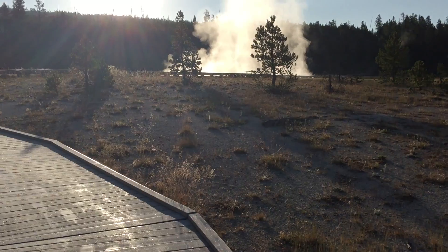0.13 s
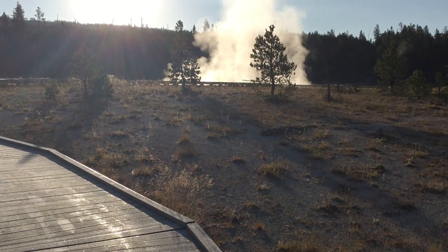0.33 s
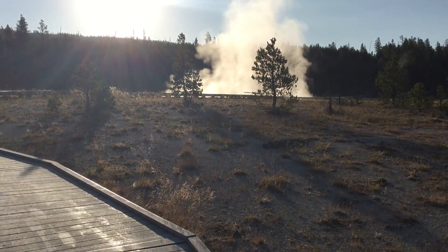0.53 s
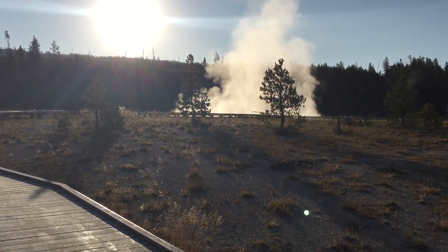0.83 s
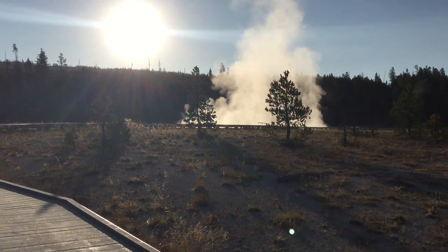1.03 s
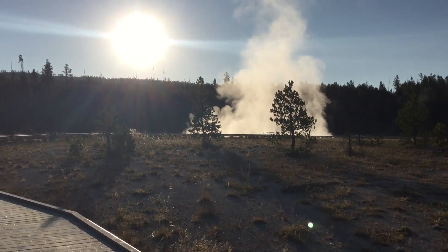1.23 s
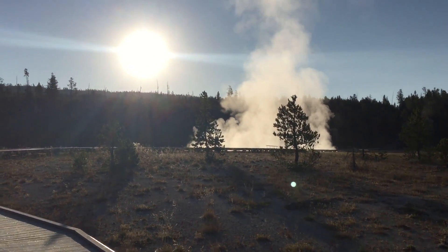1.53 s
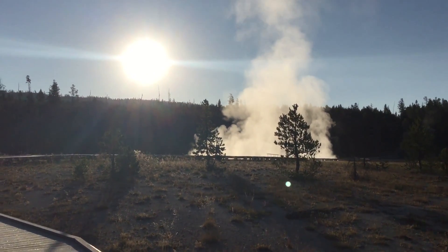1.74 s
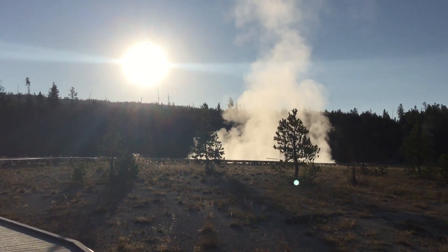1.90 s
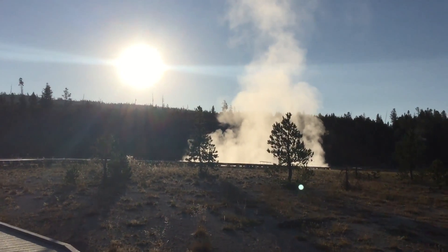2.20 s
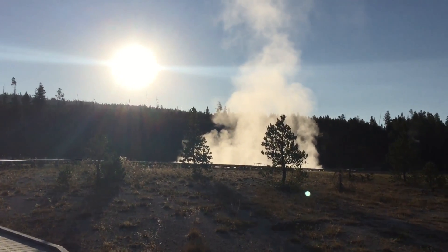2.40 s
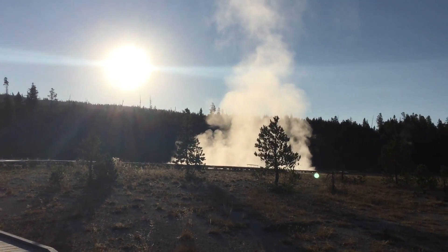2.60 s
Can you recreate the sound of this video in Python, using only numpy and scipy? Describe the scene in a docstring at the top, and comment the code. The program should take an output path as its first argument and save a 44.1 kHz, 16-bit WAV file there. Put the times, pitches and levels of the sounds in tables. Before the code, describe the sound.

A coyote pack far across a meadow gives quick overlapping yips and slightly hoarse barks, with one brief falling howl early on; faint echoes from trees, soft wind rumble, hiss and a dull handling knock.

```python
"""A coyote pack far across a meadow: overlapping yips and barks, one falling howl among the early ones.
Yips are arched harmonic tones, the howl has three harmonics; barks add lines between and coloured rasp.
Ground and air filter the pack; the tree line adds faint diffuse tails of decaying noise.
Filtered noise gives lumpy wind rumble and hiss; dull knocks on the handheld body are decaying sines."""
import sys
import numpy as np
from scipy import signal
from scipy.fft import rfft, irfft
from scipy.io import wavfile
from scipy.ndimage import uniform_filter1d

SR = 44100
rng = np.random.default_rng(int(sys.argv[2]) if len(sys.argv) > 2 else 0)


def bounce(signal):
    """Save signal as a 16-bit WAV file at the path given by the first command-line argument."""
    frames = np.transpose(np.atleast_2d(signal))
    limited = np.clip(frames, -1, 1)
    pcm = np.round(limited * 32767).astype(np.int16)
    wavfile.write(sys.argv[1], SR, pcm)


N = 121275


def amp(db):
    """Amplitude factor of a level in dB."""
    return 10 ** (np.asarray(db) / 20)


def evened(x):
    """Scale to unit RMS."""
    return x / np.sqrt(np.mean(x ** 2) + 1e-20)


def read(points, hz):
    """Interpolate a (frequency, value) curve on a log frequency axis."""
    f, value = np.transpose(points)
    return np.interp(np.log(hz + 1), np.log(f + 1), value)


def add(mix, start_s, sound):
    """Mix a sound in at its start time, cut at the end of the mix."""
    part = mix[round(start_s * SR):][:len(sound)]
    part += sound[:len(part)]


def coloured(x, points):
    """Zero-phase filter along a (frequency, dB) curve."""
    gain = amp(read(points, np.fft.rfftfreq(len(x), 1 / SR)))
    return irfft(rfft(x) * gain, len(x))


def drifting(noise, size):
    """Smooth each noise row twice over size samples: slow random drift of unit RMS."""
    smooth = uniform_filter1d(uniform_filter1d(noise, size=size), size=size)
    return np.array([evened(row) for row in smooth])


def wind_and_hiss():
    """Noise shaped frame by frame: hiss with faint patches, and wind rumble that comes in lumps."""
    # noise spectrum: (frequency [Hz], relative level [dB])
    spectrum = [(22, -46), (45, 2.5), (80, 0), (500, -13), (2000, -14), (4600, -25.5), (9800, -29.5),
                (15700, -34)]
    level_db, patchy_db, gust_db, gust_corner_hz = -68, -0.5, 0.5, 300
    frames, hz = N // 512 + 5, np.fft.rfftfreq(2048, 1 / SR)
    real, imag, patches = rng.standard_normal((frames, 1025, 3)).T
    lumps = evened(uniform_filter1d(patches[0], size=4))
    patches = uniform_filter1d(patches, size=24, axis=0)  # across frequency
    patches = evened(uniform_filter1d(patches, size=7, axis=1))  # across time
    low = 1 / (1 + (hz / gust_corner_hz) ** 2)
    gain_db = read(spectrum, hz)[:, None] + patchy_db * patches + gust_db * low[:, None] * lumps
    z = (real + 1j * imag) * amp(gain_db)
    noise = signal.istft(z, nperseg=2048, noverlap=1536)[1][:N]
    return amp(level_db) * evened(noise)


def body_knock(start_s, level_db, settled_hz):
    """A dull knock on the handheld body: a decaying sine with a louder onset and a fast pitch drop."""
    t60_s, snap, snap_s = 0.16, 2.91, 0.00366
    onset_db, onset_s, attack_s = 12.34, 0.0017, 0.00093
    t = np.arange(0, .1, 1 / SR)
    turns = np.cumsum(settled_hz * (1 + snap * np.exp(-t / snap_s))) / SR
    envelope_db = level_db - 60 * t / t60_s + onset_db * np.exp(-t / onset_s)
    attack = np.minimum(t / attack_s, 1)
    return start_s, amp(envelope_db) * attack * np.sin(2 * np.pi * turns)


def treeline(x):
    """Three diffuse decaying noise tails from stands of trees; moving air makes each come and go."""
    tail_db, t60_s, rise_s = -15, 0.661, 0.0053
    t = np.arange(SR // 2) / SR
    tails = rng.standard_normal((3, len(t))) * amp(-60 * t / t60_s) * np.clip(t / rise_s, 0, 1)
    tails /= np.linalg.norm(tails)
    stir = drifting(rng.standard_normal((len(tails), N)), size=600)
    echoes = signal.fftconvolve(x[None], tails, axes=1)[:, :N]
    return amp(tail_db) * (stir * echoes).sum(0)


def across_meadow(x):
    """Ground and air between pack and microphone colour the sound and dull its treble."""
    # path response: (frequency [Hz], gain [dB])
    path = [(500, -18.5), (700, -0.5), (950, 3), (1390, -5), (1480, -7), (1560, -2), (1800, -2.5),
            (2300, -0.5), (2750, -1), (3800, -8.5), (4600, -26.5), (5200, -38.5)]
    return coloured(x, path)


def howl():
    """A clean falling voice of three harmonics, each with its own level."""
    # voice ahead of the path: (time [s], pitch [Hz], fundamental [dB RMS],
    # 2nd harmonic [dB RMS], 3rd harmonic [dB RMS])
    contour = [(.312, 1232, -84, -92, -87), (0.362, 1225, -49, -52, -75.5), (0.412, 1180, -54, -55, -91),
               (0.462, 1043, -59.5, -58, -73), (.52, 939.8, -51.5, -80.5, -66.5),
               (0.569, 842.9, -47.5, -64, -61), (0.609, 896.2, -60, -55.5, -85.5),
               (0.701, 873, -56.5, -57.5, -82.5), (0.723, 890, -90.5, -63.5, -94),
               (0.776, 883, -65, -62, -86)]
    fade_s = 0.0062
    s, hz, *levels_db = np.transpose(contour)
    t = np.arange(s[0], s[-1], 1 / SR)
    pitch_hz = uniform_filter1d(np.interp(t, s, hz), size=600, mode="nearest")
    turns = np.cumsum(pitch_hz) / SR
    fade = np.minimum(np.minimum(t - s[0], s[-1] - t) / fade_s, 1)
    voice = np.zeros(len(t))
    for harmonic, db in enumerate(levels_db, 1):
        level = np.sqrt(2) * amp(np.interp(t, s, db))
        voice += level * np.sin(2 * np.pi * harmonic * turns)
    return s[0], fade * voice


def call(start_s, length_s, first_hz, top_hz, last_hz, top_at, loud_at, level_db, second_db, third_db,
         hoarse_db=-120, beats=2, mouth=1):
    """An arched fluttering tone; in a bark uneven fold beats add lines between harmonics, and rasp."""
    # throat colour of hoarse parts: (frequency at mouth factor 1 [Hz], gain [dB])
    throat = [(550, -14), (800, -19), (1500, 7.5), (2050, -9.5), (3500, -8.5)]
    bulge, hoarse_bulge = .6, 1.84  # envelope exponents
    wobble, fold_waver_rad = 0.00694, 0.12  # RMS pitch jitter share; waver before division by beats
    fourth_db = -13  # re 2nd harmonic
    flutter_db, uneven_db, rasp_db, blur_db = 2, 4.5, -4, -14

    noise = rng.standard_normal((24, 7000))
    u = np.arange(0, length_s, 1 / SR) / length_s
    slow = drifting(noise, size=400)[:, :len(u)]
    fast = drifting(noise[:2], size=60)[:, :len(u)]
    top_at, loud_at, beats = np.clip(top_at, .05, .95), np.clip(loud_at, .12, .88), round(beats)

    rise_hz = (top_hz - first_hz) * (1 - u / top_at) ** 2
    fall_hz = (top_hz - last_hz) * ((u - top_at) / (1 - top_at)) ** 2
    hz = top_hz - np.where(u < top_at, rise_hz, fall_hz)
    turns = np.cumsum(hz * (1 + wobble * fast[0])) / SR
    swell = np.sin(np.pi * np.interp(u, [0, loud_at, 1], [0, .5, 1])) ** bulge

    clean = np.zeros(len(u))
    for k, gain in enumerate(amp([0, second_db, third_db, second_db + fourth_db])):
        flutter = amp(flutter_db * np.sqrt(k + 1) * slow[k])
        clean += gain * swell ** k * flutter * np.sin(2 * np.pi * (k + 1) * turns)
    blur = 1 + amp(blur_db) * fast[1]

    lines = np.zeros(len(u))
    fold_phase = (2 * np.pi * turns + fold_waver_rad * fast[1]) / beats
    for k in range(1, 4 * beats):
        if k % beats:  # skip the harmonics
            lines += amp(uneven_db * slow[k + 4]) * np.sin(k * fold_phase + k * k)
    rasp = amp(rasp_db) * 2 * noise[3, :len(u)]
    hoarse = np.pad(swell ** hoarse_bulge * (lines + rasp), (0, 400))
    hoarse = coloured(hoarse, np.multiply(throat, [mouth, 1]))[:len(u)]
    return start_s, np.sqrt(2) * amp(level_db) * (swell * clean * blur + amp(hoarse_db) * hoarse)


def scene():
    """Pack heard across the meadow with tree line tails, over wind, hiss and knocks."""
    # knocks: (start [s], level before onset boost and decay [dB], settled pitch [Hz])
    knocks = [(0.965, -45.5, 81.4), (1.121, -62, 84.3)]
    # clear calls and a few faint echoes of them, ahead of the path: (start [s], length [s],
    # first pitch [Hz], top pitch [Hz], last pitch [Hz], top at [share], loudest at [share],
    # level [dB], 2nd harmonic [dB re level], 3rd harmonic [dB re level])
    yips = [(0.096, 0.0492, 1642, 1642, 1230, 0.1824, 0.574, -46, -13, -5.5),
            (0.205, 0.0986, 1316, 1573, 1327, 0.613, 0.168, -44, -10, -16.5),
            (0.253, 0.0782, 856.5, 1147, 1170, 1, 0.234, -49, -7, -29),
            (0.337, 0.0856, 717.5, 851.6, 862.6, 0.519, 1, -45, -22.5, -23),
            (0.555, 0.1375, 617, 673.5, 579, 0.55, 0.315, -62.5, 7, -11),
            (.6, 0.0398, 797.3, 828.5, 790, 0.89, 0.236, -49.5, -25.5, -38.5),
            (0.729, 0.0493, 808.5, 1123, 1160, 0.991, 0.523, -45, -13.5, -31),
            (0.756, 0.1021, 1252, 1473, 788, .55, 0.234, -42, -14.5, -20),
            (0.721, 0.0933, 710.1, 807.4, 790, 0.495, 0.583, -48.5, -41, -18),
            (0.871, 0.0384, 731, 822.7, 937, 0.713, 1, -45, -18, -21),
            (0.901, 0.0805, 1352, 1529, 1285, 0.5316, 0.316, -46.5, -26.5, -26.5),
            (1.105, 0.0373, 961.3, 1028, 987, 0.47, 1, -60.5, -10.5, -17.5),
            (1.147, 0.026, 605.2, 729.9, 690, 1, 0.56, -50, -16, -33),
            (1.171, 0.0978, 975, 1274, 1075, 0.625, 0.28, -44.5, -27.5, -40),
            (1.361, 0.0694, 1044, 1261, 1007, 0.393, 0.62, -60, -1, -27.5),
            (1.477, 0.0773, 756.2, 918.5, 860, 0.3576, 0.34, -50, -7, -29),
            (1.554, 0.0231, 1018, 1228, 1274, 0.766, 0.224, -60.5, 4, -15),
            (1.561, 0.0399, 1260, 1394, 1194, 0.527, 0.48, -45, -19.5, -31.5),
            (1.925, 0.12, 609.8, 930.8, 809.4, 0.59, 0.631, -44, -10, -10.5),
            (2.071, 0.15, 892.7, 954, 915, 0.58, 0.5, -66, -10, -31.5),
            (2.129, 0.0405, 1134, 1272, 1180, 0.524, 0.17, -57.5, -25.5, -32),
            (2.177, 0.03537, 594.3, 832.5, 760, 0.89, 0.79, -45.5, -40, -24.5),
            (2.38, 0.02833, 729.5, 782.4, 810, 1, 1, -48.5, 1, 1.5),
            (2.399, 0.09025, 804.4, 932.8, 754, 0.646, 0.087, -42, -12, -9.5),
            (2.489, 0.0917, 646.1, 701.7, 596, 0.432, 1, -55, -38, -34),
            (2.503, 0.15, 895.4, 946, 828, 0.301, 0.31, -61.5, -17.5, -23.5),
            (2.659, 0.0359, 1624, 1527, 1578, 0.343, 1, -58, -24, -29),
            (2.697, 0.079, 646, 820.5, 789, 0.602, 0.388, -53.5, -29.5, -31.5)]
    # hoarse calls: (the ten columns of yips, hoarse part [dB re level],
    # fold beats per repeating pattern [count], mouth opening [factor on throat resonances])
    barks = [(.1, 0.1554, 1015, 1001, 881, 0.232, 0.135, -64.5, -15.5, -20, -7.5, 4, 0.962),
             (.185, 0.0925, 603.2, 823.8, 698, 0.809, 0.837, -44, -35, -26.5, -11.5, 2, 1.012),
             (0.904, 0.0917, 993.8, 1000, 843.6, 0.447, 0.54, -52, -10.5, -14.5, -5.5, 2, 1.078),
             (1.172, 0.0792, 809.4, 937.7, 909.7, 0.3675, 0.432, -41.5, -22, -24, -18.5, 4, 1.026),
             (1.3, 0.0878, 742.2, 954.6, 880.2, 0.577, 0.712, -42, -26, -48, -22, 4, 1.058),
             (1.395, 0.05, 906.3, 982.6, 841, 0.456, 0.343, -61.5, -28, -29.5, -12.5, 4, 0.847),
             (1.484, 0.0965, 993.8, 1061, 938, 0.6166, 0.615, -43, -22.5, -28.5, -19.5, 4, 1.163),
             (1.608, 0.0172, 948, 918, 860, 0.265, 0.32, -63, -13.5, -23, -32, 4, 0.904),
             (1.74, 0.06, 652.6, 899.1, 917, 0.82, 0.754, -42.5, -27, -36, -20, 4, 0.993),
             (1.789, 0.075, 968.6, 1006, 858.7, 0.314, 0.187, -49, -23, -17, -12.5, 4, 1.08),
             (1.914, 0.0732, 781.7, 981.7, 866, .8, 0.974, -42, -26.5, -28.5, -9, 2, 1.201),
             (2.208, 0.078, 873.7, 883.7, 653, 0.716, 0.371, -56, -9, -24, -11.5, 2, 1.45),
             (2.337, 0.08815, 606.2, 765, 647.4, 0.56, 0.58, -52, -16, -28.5, -17.5, 2, .85)]
    pack, near = np.zeros(N), wind_and_hiss()
    for row in knocks:
        add(near, *body_knock(*row))
    add(pack, *howl())
    for row in yips + barks:
        add(pack, *call(*row))
    pack = across_meadow(pack)
    return (pack + treeline(pack) + near)[None]


def record(dry):
    """Silent until the recorder opens, then the band limit."""
    start_s, edge_hz = .12, 15750
    opened = dry * (np.arange(N) >= start_s * SR)
    lowpass = signal.firwin(511, edge_hz, window=("kaiser", 9), fs=SR)
    return signal.oaconvolve(opened, lowpass[None], "same")


dry = scene()
out = record(dry)
bounce(out)
```